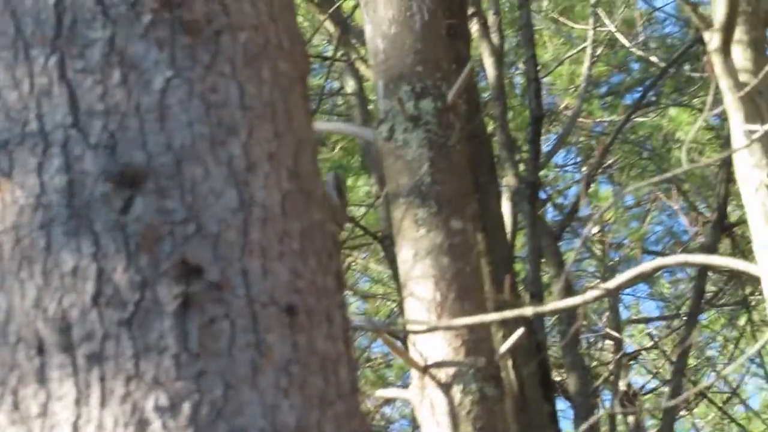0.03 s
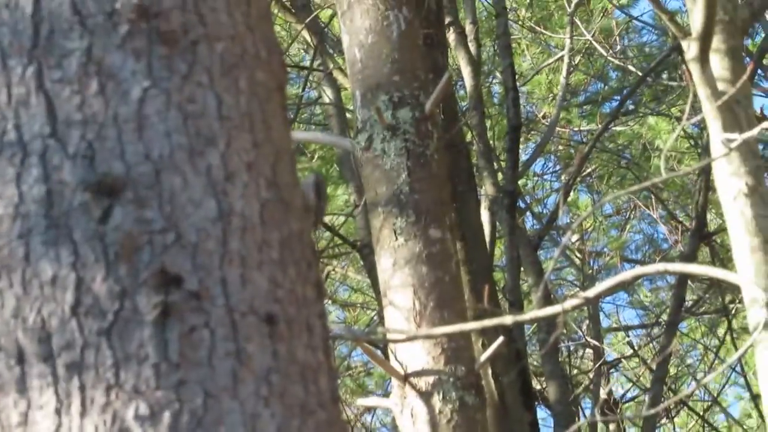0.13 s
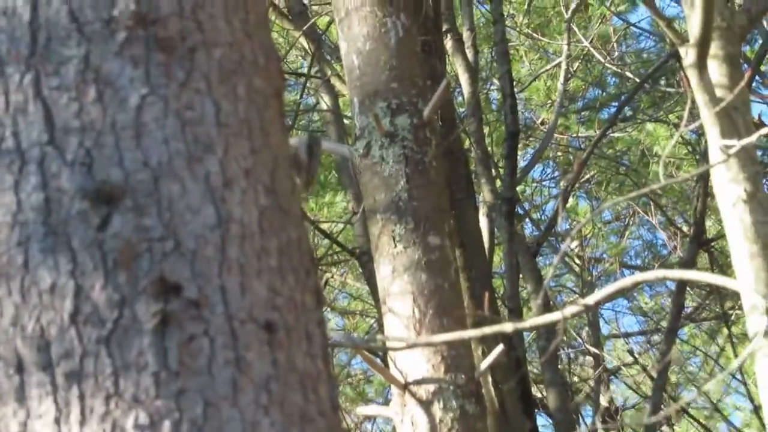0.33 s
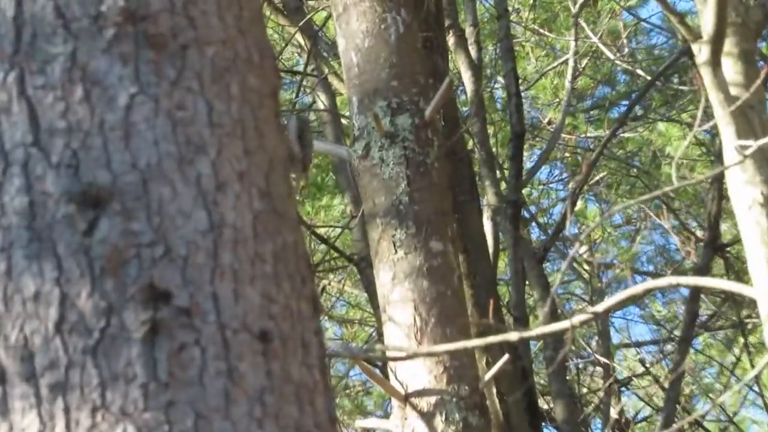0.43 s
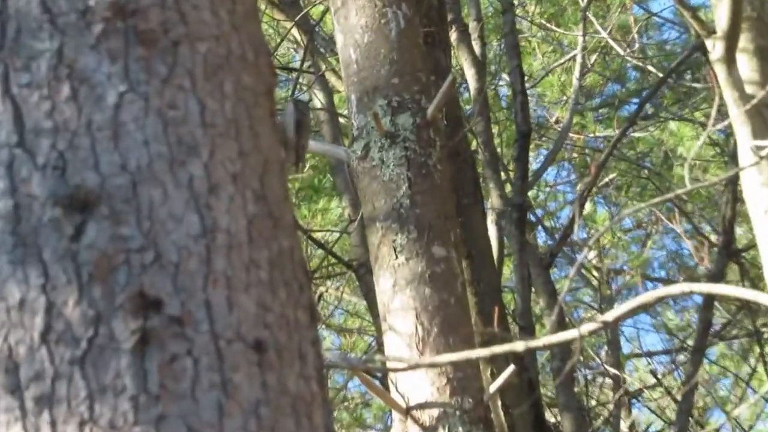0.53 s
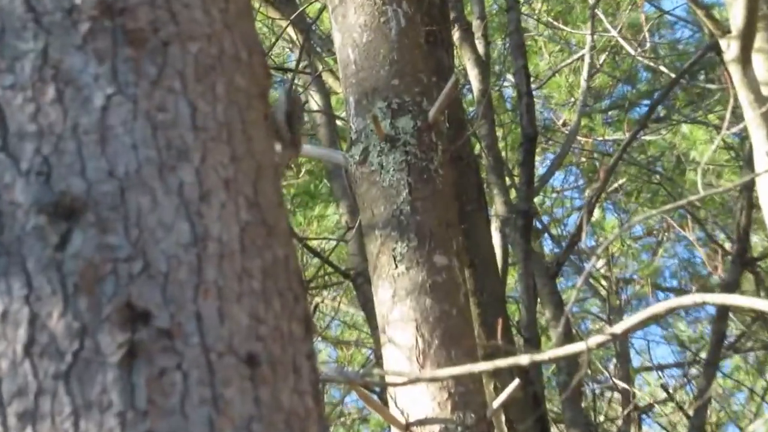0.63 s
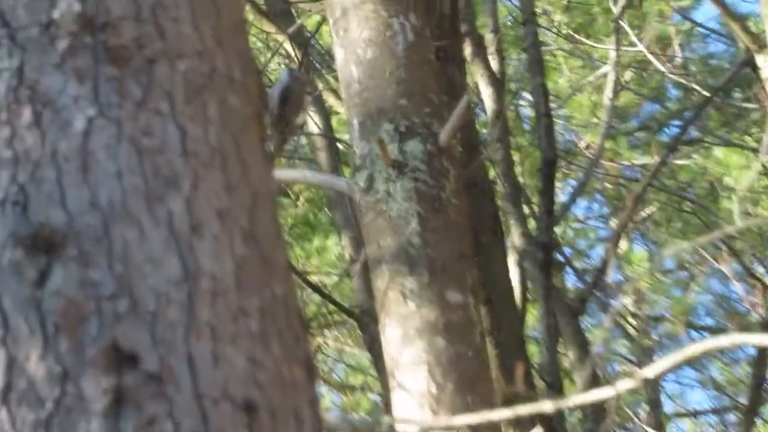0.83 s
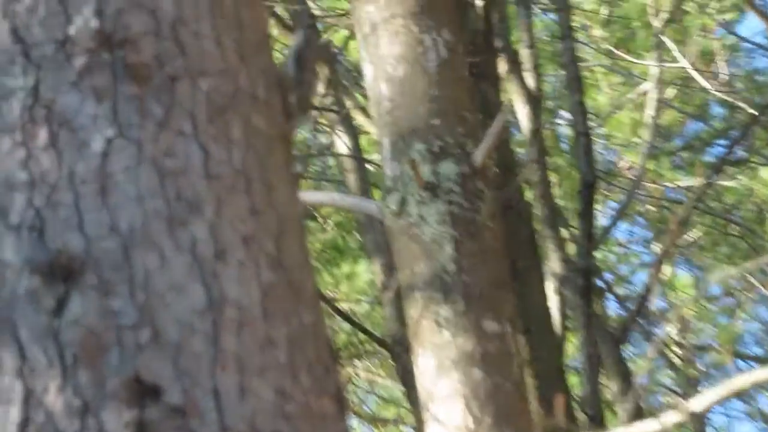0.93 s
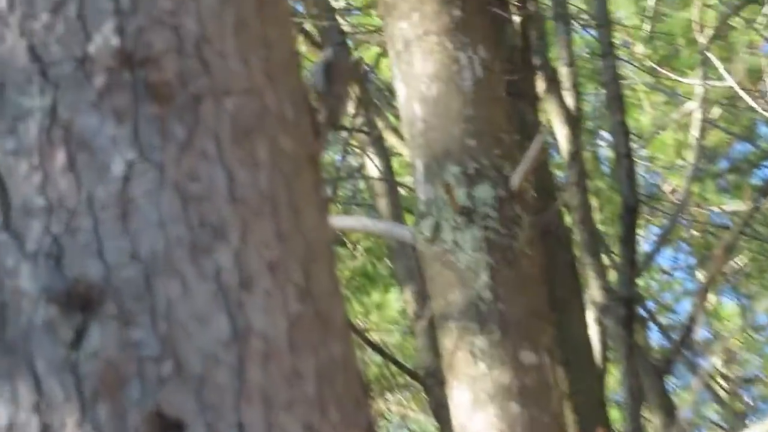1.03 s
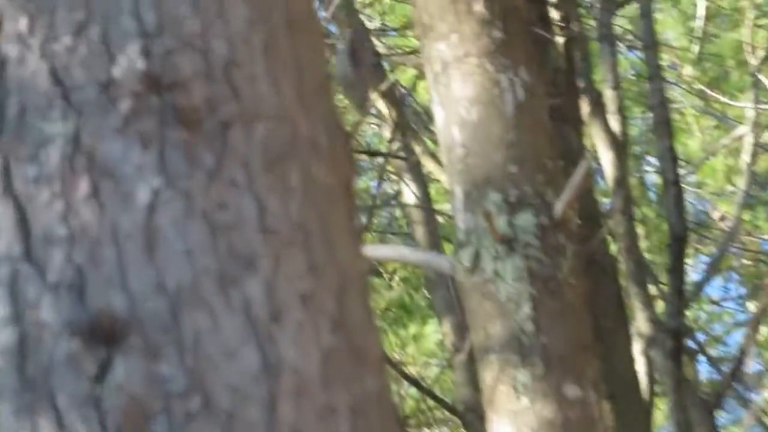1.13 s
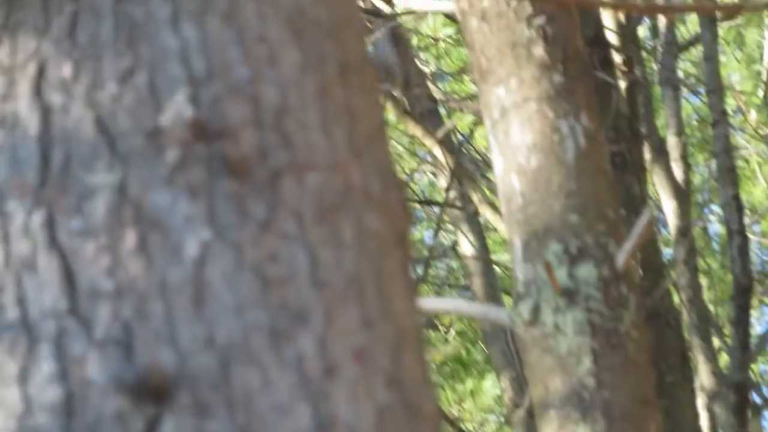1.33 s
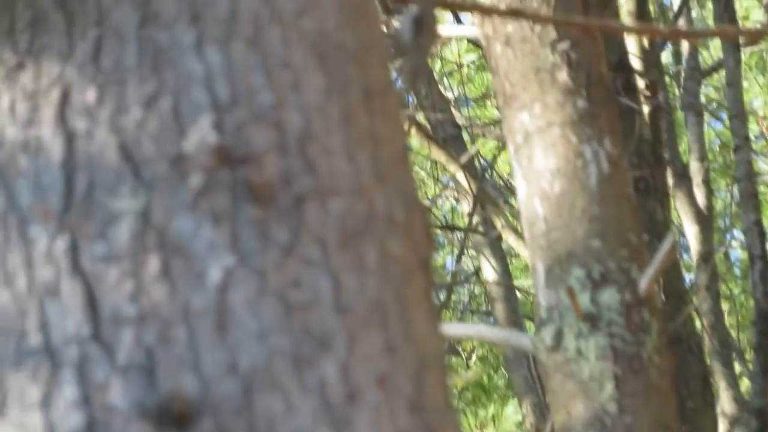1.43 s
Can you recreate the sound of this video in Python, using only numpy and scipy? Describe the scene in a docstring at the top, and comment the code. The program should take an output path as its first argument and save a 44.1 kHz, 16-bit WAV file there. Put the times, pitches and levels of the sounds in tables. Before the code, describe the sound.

A camera zoom motor whirrs with a fine, high buzz, just after light finger rubbing and one sharp click on the plastic body. It is heard right at the microphone, over a faint outdoor rumble and hiss.

```python
"""In quiet woods, someone holds a camera over a faint outdoor rumble and microphone hiss.
A finger rubs and ticks on the body, making the plastic ring. A control snaps with a sharp crack,
then the level dips briefly and the hand gives a soft bump. The zoom motor whirrs in fast steps,
each one knocking its gears, until it stops with a small tick."""
import sys
import numpy as np
from scipy.fft import rfft, irfft, next_fast_len
from scipy.io import wavfile
from scipy.ndimage import uniform_filter1d, map_coordinates

SR = 44100
rng = np.random.default_rng(int(sys.argv[2]) if len(sys.argv) > 2 else 0)


def wrap_up_sound(samples):
    """Save the sound to the file named by the first command line argument, as 16-bit audio."""
    columns = np.atleast_2d(samples).T
    # keep every value between -1 and 1, then stretch to whole-number steps
    tamed = np.clip(columns, -1, 1)
    steps = np.round(tamed * 32767).astype(np.int16)
    wavfile.write(sys.argv[1], SR, steps)


N = 66150

# tone of the outdoor rumble and the microphone hiss (frequency [Hz], level [dB])
RUMBLE_TONE = [(20, -28), (40, -8.5), (65, -4.5), (105, 2), (170, -3), (300, -3), (480, -8.5), (540, -8.5),
               (610, -17), (690, -16), (860, -14), (1300, -18.5), (1650, -26), (1900, -54), (4000, -60)]
HISS_TONE = [(1000, 2), (2200, 3.5), (3500, -1), (5300, -2.5), (8300, 4.5), (11000, 3), (14000, 0.5),
             (14900, -8), (15400, -37)]
# how the rumble rises and falls (time [s], level [dB])
RUMBLE_SWELL = [(0, -49.5), (.3, -48), (.65, -49.5), (1.0, -49), (1.2, -48), (1.34, -47.5), (1.5, -48.5)]
# how alike left and right sound for each source (frequency [Hz], likeness [-1 to 1])
AIR_LIKENESS = [(50, -0.082), (140, -0.45), (300, -0.66), (700, -0.62), (1400, -0.16), (3100, -0.44),
                (6800, 0.8), (14000, 1)]
BODY_LIKENESS = [(1000, 0.44), (3000, 0.27), (12000, 1)]
CRACK_LIKENESS = [(1000, 0.25), (6000, 0.33), (12000, -0.47)]
MOTOR_LIKENESS = [(400, -0.034), (1400, 0.56), (3000, 0.26), (7000, 0.82), (14000, .7)]
# which side each source leans to (frequency [Hz], left minus right [dB])
AIR_PAN = [(1000, 0)]
BODY_PAN = [(1400, -1), (2500, 4.5), (7000, 0.5), (13000, 3)]
MOTOR_PAN = [(900, 9.5), (1500, 0.5), (2400, 6), (4000, 8), (8200, 1), (10100, 7.5), (10800, 19),
             (12000, 12), (14000, 5.5)]
# finger strokes (start [s], end [s], level [dB])
STROKES = [(0, .31, -61), (0.212, 0.24, -59.5), (0.311, 0.37, -51.5), (.366, 0.4157, -60),
           (0.433, .487, -51), (0.487, 0.56, -53)]
# tone of the rubbing and of cracks from the plastic (frequency [Hz], level [dB])
RUB_TONE = [(250, -6), (450, 3), (700, -8), (950, -4.5), (1450, -1.5), (1800, -3.5), (2750, -5.5),
            (3300, -12.5), (4200, -17.5), (8000, -21.5), (14900, -26), (15400, -55)]
CRACK_TONE = [(1000, -9), (4000, -8), (5200, -12), (6700, -4), (8600, -1), (10800, -4), (14000, -4),
              (15200, -20)]
# notes the body rings with when bumped, ticked or snapped
# (frequency [Hz], level [dB], time to fade 60 dB [s], left minus right [dB])
BUMP_NOTES = [(185, 0, .06, 0), (300, -3, .04, 0)]
TICK_NOTES = [(374, -16, 0.035, -11.5), (1345, -15, 0.02, 1), (1520, -2, 0.017, -4),
              (1860, -12.5, 0.022, 6), (2220, -1, 0.012, 4.5), (2716, -2, .015, 3.5),
              (3007, -9.5, 0.02, 8.5), (3470, -11.5, 0.0073, 9)]
SNAP_NOTES = [(384, -16, 0.059, -6.5), (526, -17, 0.064, 2.5), (840, -20.5, 0.041, -1),
              (1042, -18.5, 0.042, -6), (1306, -8.5, .022, 2), (1438, -2, .019, -4.5),
              (1690, -13.5, .026, 3), (2350, -4.5, 0.015, 3), (2706, -9.5, 0.014, 11),
              (3095, -14, 0.011, 11), (3840, -8.5, 0.01, 2), (6460, -10, 0.0069, 8.5),
              (7300, -4, 0.0024, -2), (11040, -6, 0.0039, 9.5), (13100, 0, .0016, 3)]
# how far the ringing on the left runs ahead (frequency [Hz], phase [radians])
LEFT_LEAD = [(400, 2), (1400, 0.61), (2300, 1), (3900, -1.35), (7000, -4.5), (11000, -1.7), (13000, -2.3)]
# light ticks, and the snap with its rebounds (time [s], level [dB], treble tilt [dB per octave])
TICK_HITS = [(0.1837, -38.5, -0.5), (0.2055, -28, 3), (0.2079, -43.5, -6.5), (0.312, -39, 8.5),
             (0.3202, -38.5, 7), (0.3285, -40.5, -3), (0.345, -38.5, 4.5), (0.3586, -39.5, -3),
             (0.46, -40, 7), (0.4784, -33.5, 5.5), (0.4952, -36, 6), (0.502, -34, -7.5),
             (0.5167, -33, -3.5), (1.3781, -43, -5.5)]
SNAP_HITS = [(0.4227, -14, 2.5), (0.4276, -34.5, 4), (0.4302, -34, -4)]
# pitches where the body hardly answers a snap (frequency [Hz], width [Hz])
BODY_NOTCHES = [(250, 110), (650, 70), (1980, 190), (4650, 300), (7750, 340)]
# tone of the motor's gear knocks, extra starting knocks, whirr and squeak (frequency [Hz], level [dB])
GEAR_TONE = [(300, 10), (550, -3), (700, -30), (900, -1.5), (1040, 4.5), (1090, -5), (1400, 4), (1520, 9),
             (1620, 6), (1780, -12), (2050, -1), (2290, 4.5), (2420, 3.5), (2560, -4), (2740, 2),
             (2860, -1.5), (3000, 2), (3250, -3), (3390, 0.5), (3520, -13), (3750, -13), (3930, -3.5),
             (4350, -19.5), (5000, -32), (15000, -40), (15500, -62)]
START_TONE = [(900, -6), (1500, -9), (1900, -5), (2150, 8), (2350, 13), (2600, -6), (3150, 3), (4200, -16),
              (9000, -24), (14000, -25), (15400, -50)]
WHIRR_TONE = [(4000, -5.5), (5100, -21.5), (6200, -8.5), (6900, -5), (7350, 1), (7750, -3.5), (8300, 0.5),
              (8700, -2.5), (9500, 3.5), (9800, -1.5), (10150, 4), (10500, -8), (11400, -6), (11900, 0),
              (12600, -5), (13500, -3), (14200, -8), (14550, -6), (14900, -18), (15400, -45)]
SQUEAK_TONE = [(11000, -36), (12500, 2), (13350, 13), (13700, 12), (14200, -18), (15400, -45)]
# how the whirr rises and falls (time [s], level [dB])
WHIRR_SWELL = [(.557, -72.5), (.61, -65), (.72, -68), (1.0, -66.5), (1.28, -66.5), (1.355, -62),
               (1.38, -64.5)]
# strength of whirr and squeak, repeating every six motor steps (level [dB])
WHIRR_ACCENTS = [-1, -4, -0.5, -4, -0.5, 1.5]
SQUEAK_ACCENTS = [-6, -14, -12, -17, -6, -2]
# lasting notes of the gears, and ones that fade after the start (frequency [Hz], level [dB])
GEAR_NOTES = [(1502, -76.5), (2298, -76), (2422, -77), (2961, -81), (3382, -80)]
WHINE_NOTES = [(2290, -60), (2400, -60)]

MOTOR_ON_S, MOTOR_OFF_S, STEP_HZ = .557, 1.376, 119.9
TIME = np.arange(N) / SR


def amp(db):
    """Turn decibels into a gain."""
    return 10 ** (np.asarray(db) / 20)


def unit(x):
    """Scale a signal to an average power of 1."""
    return x / np.sqrt(np.mean(x ** 2) + 1e-20)


def look_up(table, hz):
    """Read between a table's rows on a pitch scale."""
    freqs, values = np.transpose(table)
    return np.interp(np.log(hz + 1), np.log(freqs + 1), values)


def swell(table):
    """Gain over time from (time [s], level [dB]) rows."""
    return amp(np.interp(TIME, *np.transpose(table)))


def gate(start, end, edge_s):
    """Ramp up to 1 from the start, and back to 0 from the end."""
    return np.clip((TIME - start) / edge_s, 0, 1) * np.clip((end - TIME) / edge_s + 1, 0, 1)


def fade(start, fade_s):
    """Start suddenly, then fall 60 dB every fade_s."""
    age = TIME - start
    return (age >= 0) * amp(-60 * np.abs(age) / fade_s)


def wander(rate_hz):
    """A smooth random wobble."""
    return map_coordinates(rng.standard_normal(N // 10), [TIME * rate_hz])


def sides(db):
    """Left and right gains for a level difference."""
    return np.array([amp(db / 2), amp(-db / 2)])


def filtered(x, response):
    """Give each frequency the gain that response(hz) asks for."""
    size = next_fast_len(N + 8192)
    return irfft(rfft(x, size) * response(np.fft.rfftfreq(size, 1 / SR)), size)[..., :N]


def notch(hz, centre_hz, width_hz):
    """A filter shape that cuts out one narrow band."""
    return (centre_hz ** 2 - hz ** 2) / (centre_hz ** 2 - hz ** 2 + 1j * hz * width_hz)


def noise(tone, likeness, pan):
    """Stereo noise: one part is shared by both sides, the other is opposite."""
    def shares(hz):
        angle = np.arccos(np.clip(look_up(likeness, hz), -1, 1)) / 2
        return np.array([np.cos(angle), np.sin(angle)])
    shared, opposite = filtered(rng.standard_normal((2, N)), shares)
    stereo = np.array([shared + opposite, shared - opposite])
    return unit(filtered(stereo, lambda hz: amp(look_up(tone, hz)) * sides(look_up(pan, hz))))


def ring(notes, start, tilt, attack_s, detune=0):
    """One blow makes the camera body ring with quickly fading notes."""
    out, first = np.zeros((2, N)), int(start * SR)
    t = np.arange(min(SR // 10, N - first)) / SR
    for (hz, db, fade_s, pan_db), chance in zip(notes, rng.standard_normal(len(notes))):
        phase = look_up(LEFT_LEAD, hz) * np.array([[0], [-1]])
        rise = 1 - np.exp(-t / attack_s)
        decay = amp(db + tilt * np.log2(hz / 2000) - 60 * t / fade_s)
        wave = np.sin(2 * np.pi * hz * (1 + detune * chance) * t + phase)
        out[:, first:first + len(t)] += sides(pan_db)[:, None] * rise * decay * wave
    return out


def rumble():
    """The low, gently swelling noise of the outdoors."""
    return swell(RUMBLE_SWELL) * noise(RUMBLE_TONE, AIR_LIKENESS, AIR_PAN)


def hiss():
    """The microphones' own steady noise."""
    return amp(-65.5) * noise(HISS_TONE, AIR_LIKENESS, AIR_PAN)


def rubbing():
    """A finger drags over the body with grainy friction."""
    grain = unit(amp(wander(rate_hz=245.5)))
    strokes = sum(amp(db) * gate(start, end, edge_s=.003) for start, end, db in STROKES)
    return strokes * grain * noise(RUB_TONE, BODY_LIKENESS, BODY_PAN)


def bump():
    """The hand nudges the body: a dull, low thud."""
    return amp(-39) * ring(BUMP_NOTES, start=.502, tilt=0, attack_s=.003)


def ticks():
    """Light touches ring the plastic, each with a faint crack."""
    soft_hz = 4200  # a light touch rings little above this
    rings = sum(amp(db) * ring(TICK_NOTES, start, tilt, attack_s=.00057, detune=.0059)
                for start, db, tilt in TICK_HITS)
    rings = filtered(rings, lambda hz: 1 / np.sqrt(1 + (hz / soft_hz) ** 8))
    cracks = sum(amp(db - 23.5) * fade(start, fade_s=.013) for start, db, _ in TICK_HITS)
    return rings + cracks * noise(CRACK_TONE, BODY_LIKENESS, BODY_PAN)


def snap():
    """A control snaps and rebounds: a bright crack and a short ring of the body."""
    crack_s = .4226
    rings = sum(amp(db) * ring(SNAP_NOTES, start, tilt, attack_s=.00052) for start, db, tilt in SNAP_HITS)
    decay = fade(crack_s, fade_s=.0063) + amp(-12) * fade(crack_s, fade_s=.033)
    crack = amp(-23.5) * decay * noise(CRACK_TONE, CRACK_LIKENESS, BODY_PAN)
    body = lambda hz: np.prod([notch(hz, *band) for band in BODY_NOTCHES], axis=0)
    return filtered(rings + crack, body)


def steady(x):
    """Hold the power of a noise even from one motor step to the next."""
    power = uniform_filter1d(np.mean(x ** 2, axis=0), size=int(SR / STEP_HZ / 2))
    return x / np.sqrt(np.abs(power) + 1e-12)


def gear_notes(notes):
    """Meshing gears sing faint notes that drift a little in pitch."""
    drift_hz = 9.08
    waves = sum(amp(db) * np.sin(2 * np.pi * np.cumsum(hz + drift_hz * wander(rate_hz=20)) / SR)
                for hz, db in notes)
    return np.sqrt(2) * waves * sides(db=1.5)[:, None]


def zoom_motor():
    """Each step knocks the gears and whirrs, and some squeak; the first steps knock hardest."""
    rise_s, start_decay_s, whine_decay_s = .00056, .052, .075
    elapsed = np.maximum(TIME - MOTOR_ON_S, 0)
    step = np.round(elapsed * STEP_HZ).astype(int)
    age = elapsed % (1 / STEP_HZ)
    build_up = np.exp((age - 1 / STEP_HZ) / rise_s)  # each step swells before it knocks
    burst = lambda decay_s, floor: floor + np.maximum(np.exp(-age / decay_s), build_up)
    accents = lambda steps_db: amp(steps_db)[step % len(steps_db)]
    rasp = lambda tone: noise(tone, MOTOR_LIKENESS, MOTOR_PAN)
    uneven = amp(.6 * rng.standard_normal(step[-1] + 1))[step]
    knocks = burst(decay_s=.0024, floor=.45) * uneven
    gears = amp(-56) * knocks * steady(rasp(GEAR_TONE))
    start = amp(-48.5) * np.exp(-elapsed / start_decay_s) * knocks * steady(rasp(START_TONE))
    pulses = accents(WHIRR_ACCENTS) * burst(decay_s=.00065, floor=1.93)
    whirr = swell(WHIRR_SWELL) * pulses * rasp(WHIRR_TONE)
    squeak = amp(-50.5) * accents(SQUEAK_ACCENTS) * burst(decay_s=.001, floor=0) * rasp(SQUEAK_TONE)
    whine = np.exp(-elapsed / whine_decay_s) * gear_notes(WHINE_NOTES)
    running = gate(MOTOR_ON_S, MOTOR_OFF_S, edge_s=.00033)
    return running * (gears + start + whine + whirr + squeak + gear_notes(GEAR_NOTES))


def scene():
    """Camera sounds over rumble and hiss; the level dips briefly after the snap, the rumble most."""
    dip = gate(.486, .554, edge_s=.003)
    background = amp(-5 * dip) * rumble() + amp(-4.5 * dip) * hiss()
    camera = snap() + ticks() + bump() + rubbing() + zoom_motor()
    return amp(-10 * dip) * (background + camera)


def record(dry):
    """The microphones miss one narrow band, and the highest treble is cut off."""
    top_hz = 16500
    return filtered(dry, lambda hz: notch(hz, centre_hz=677, width_hz=143) * (hz < top_hz))


dry = scene()
out = record(dry)
wrap_up_sound(out)
```